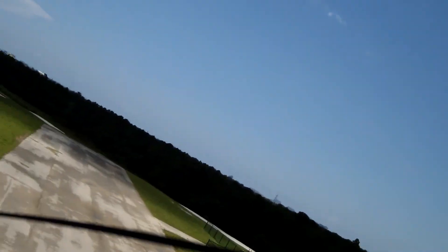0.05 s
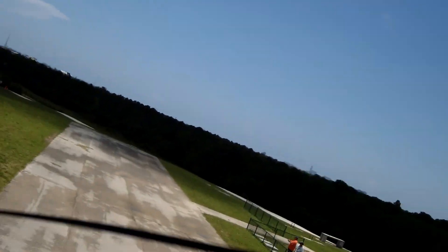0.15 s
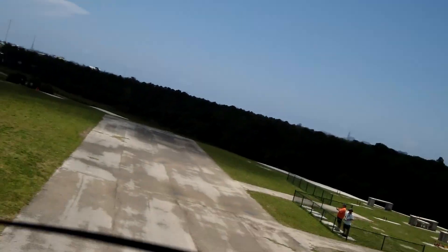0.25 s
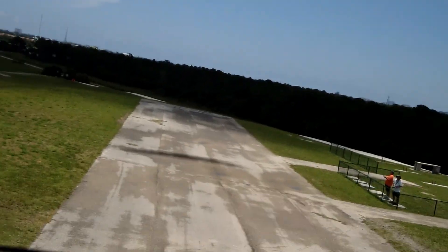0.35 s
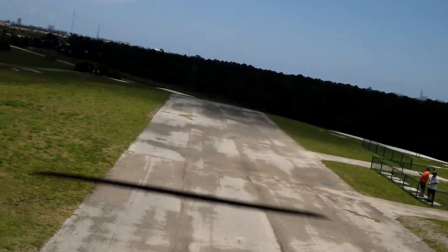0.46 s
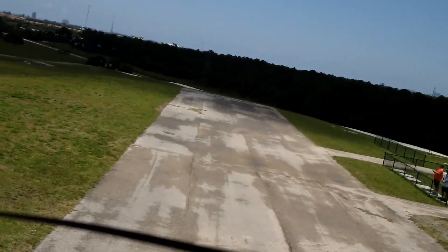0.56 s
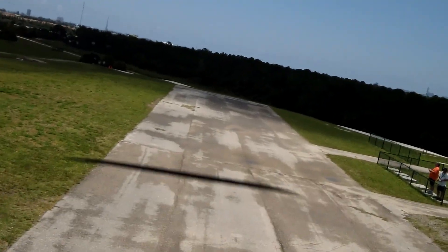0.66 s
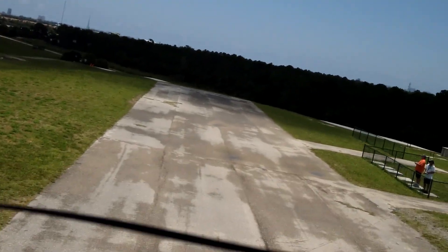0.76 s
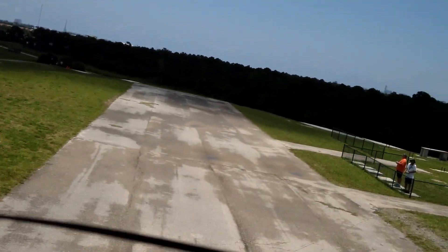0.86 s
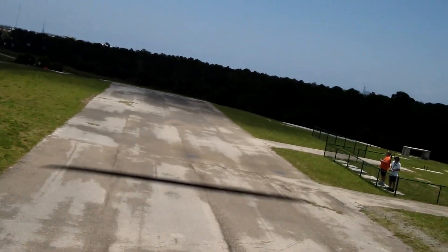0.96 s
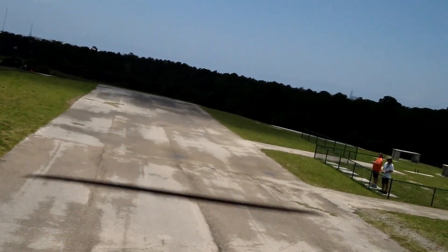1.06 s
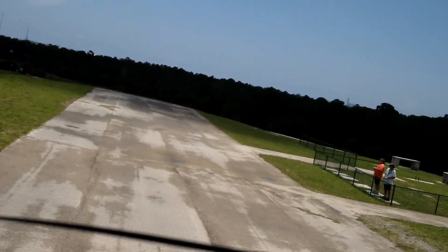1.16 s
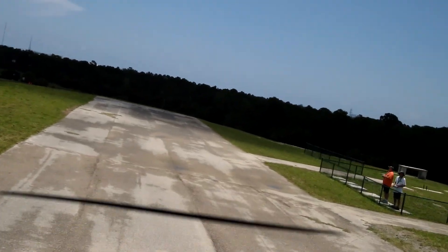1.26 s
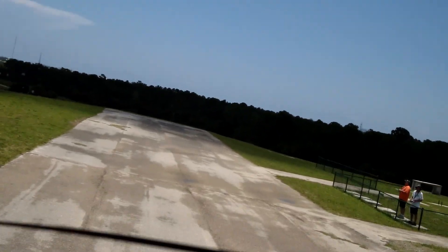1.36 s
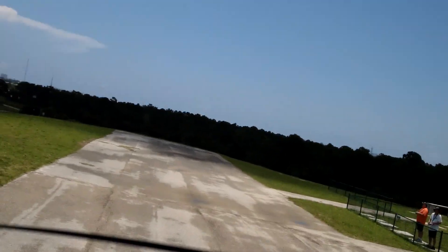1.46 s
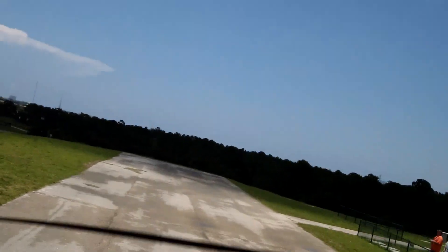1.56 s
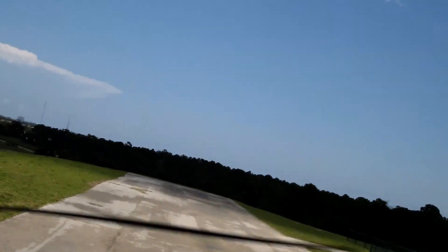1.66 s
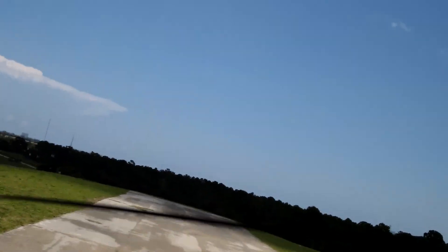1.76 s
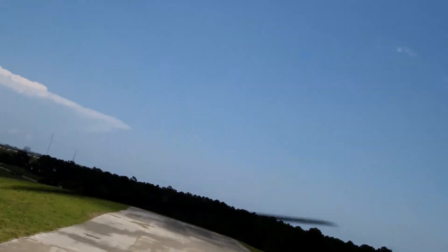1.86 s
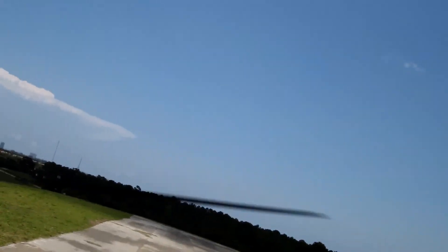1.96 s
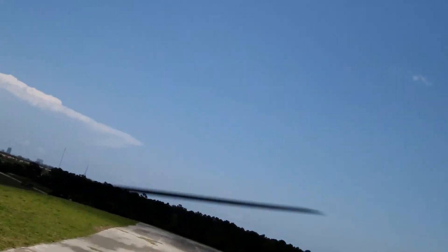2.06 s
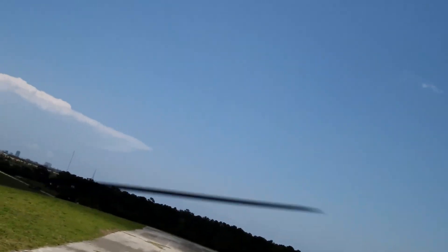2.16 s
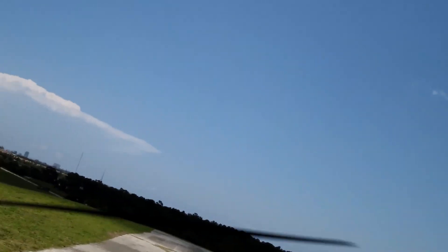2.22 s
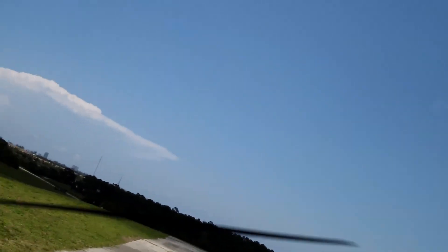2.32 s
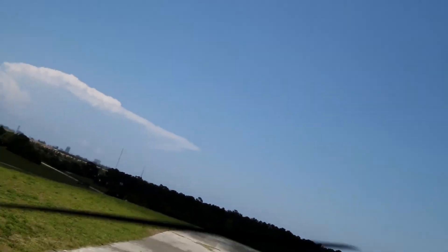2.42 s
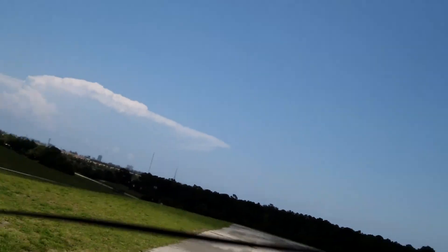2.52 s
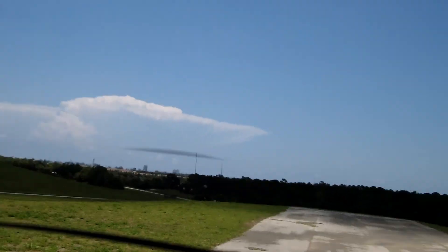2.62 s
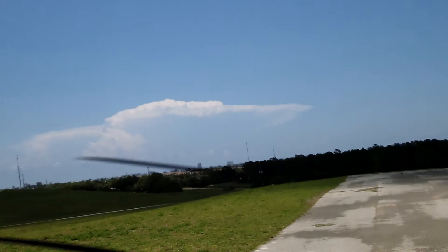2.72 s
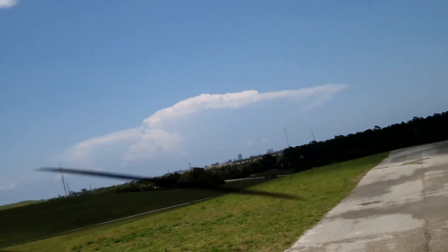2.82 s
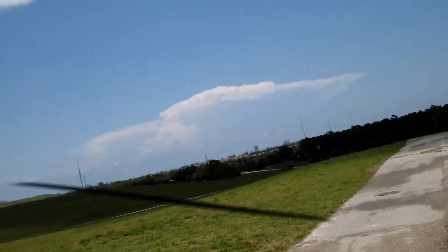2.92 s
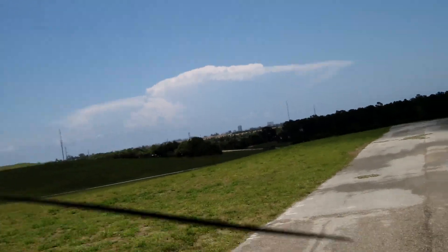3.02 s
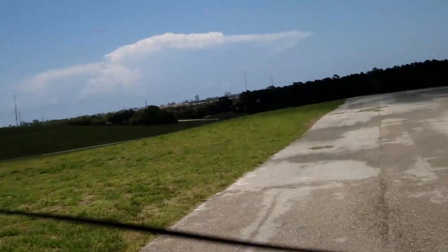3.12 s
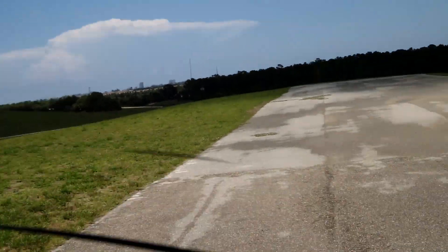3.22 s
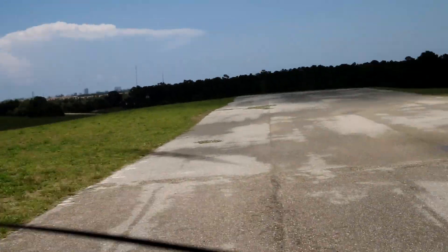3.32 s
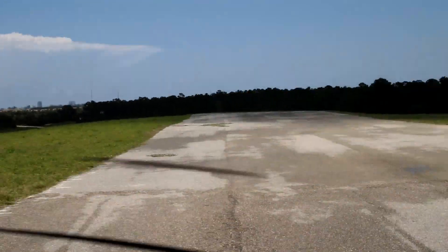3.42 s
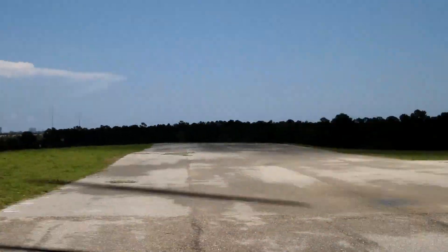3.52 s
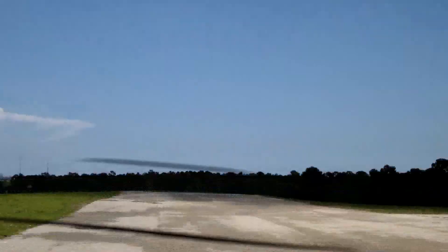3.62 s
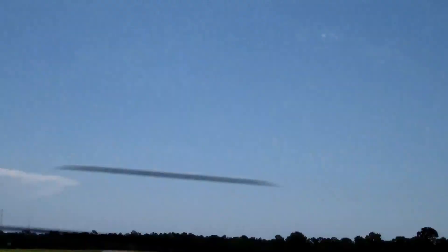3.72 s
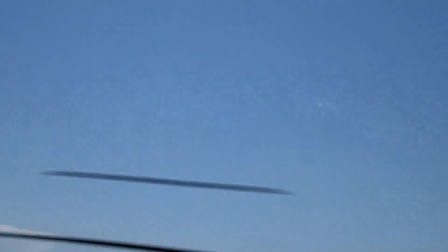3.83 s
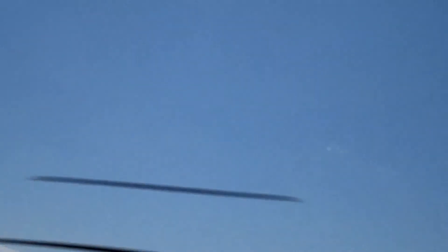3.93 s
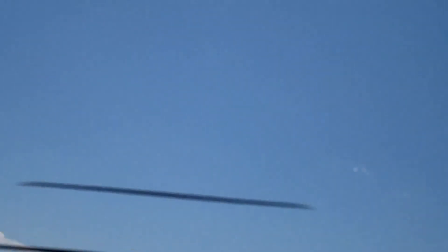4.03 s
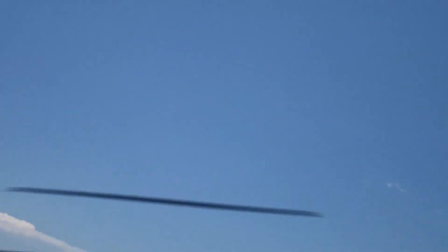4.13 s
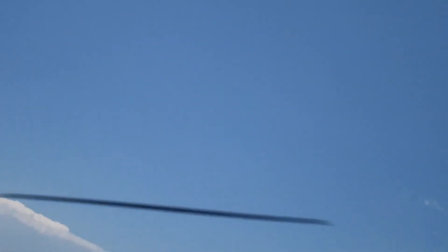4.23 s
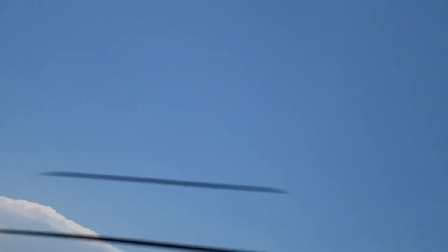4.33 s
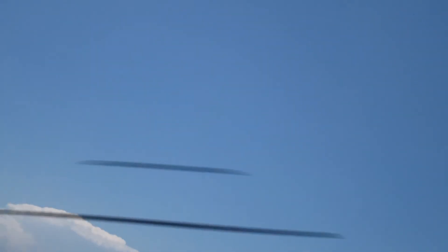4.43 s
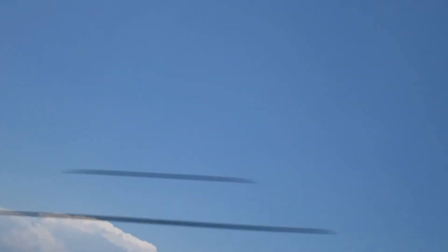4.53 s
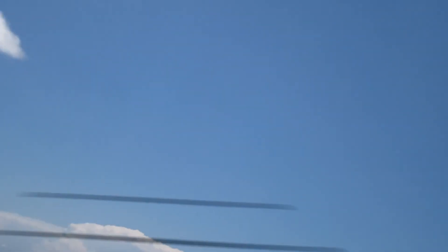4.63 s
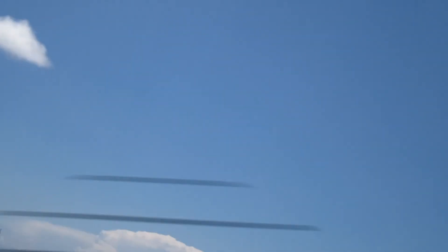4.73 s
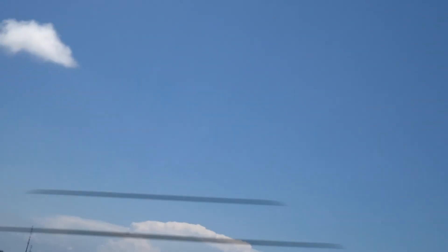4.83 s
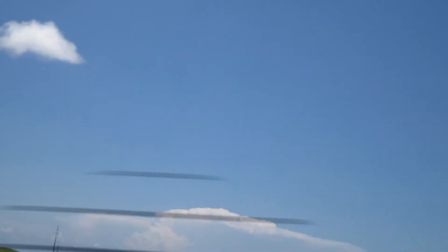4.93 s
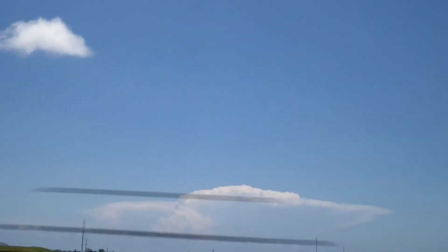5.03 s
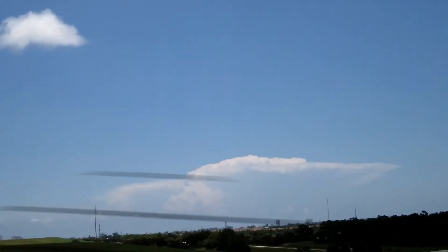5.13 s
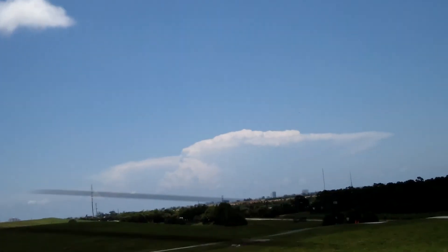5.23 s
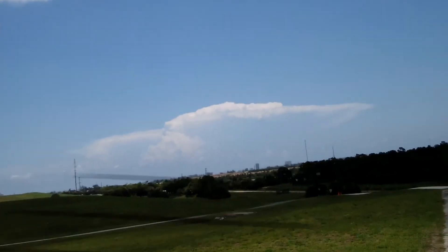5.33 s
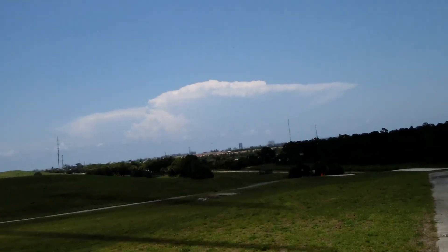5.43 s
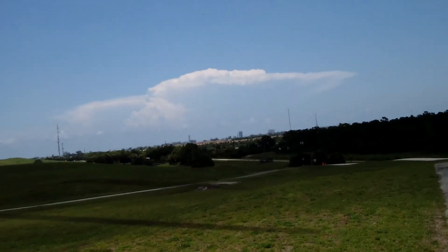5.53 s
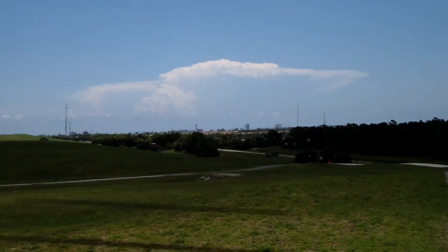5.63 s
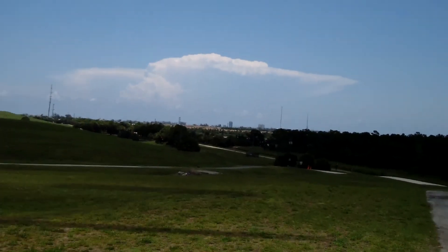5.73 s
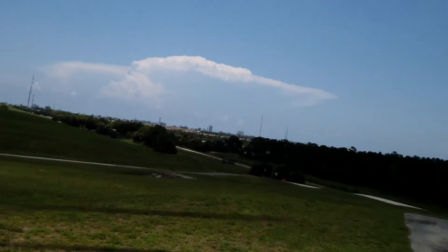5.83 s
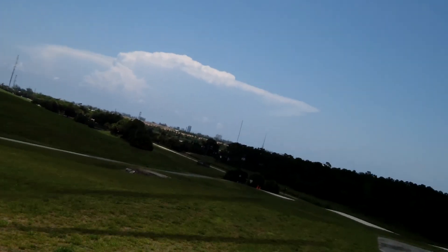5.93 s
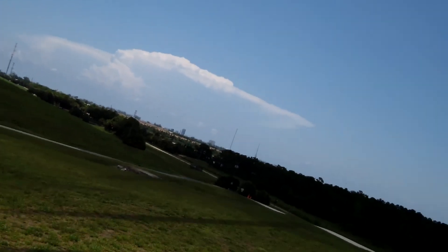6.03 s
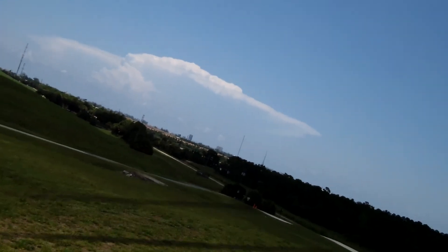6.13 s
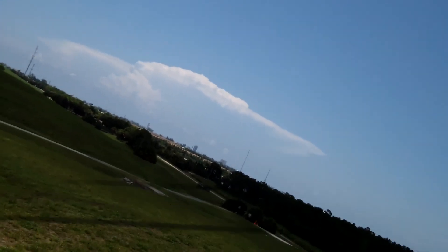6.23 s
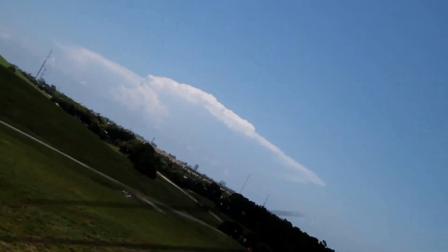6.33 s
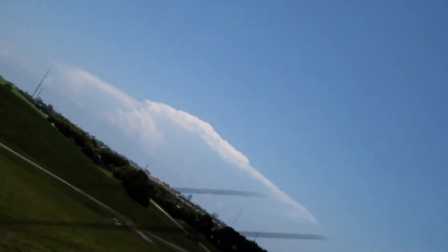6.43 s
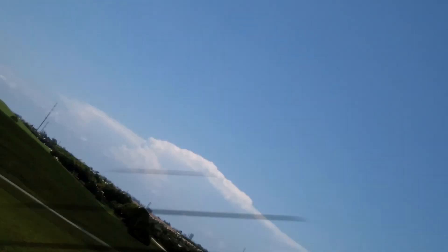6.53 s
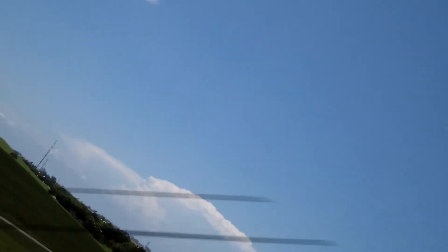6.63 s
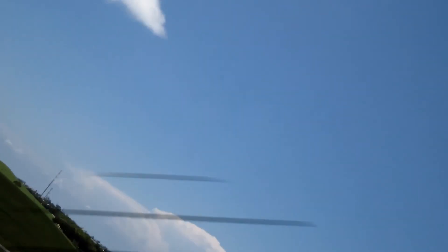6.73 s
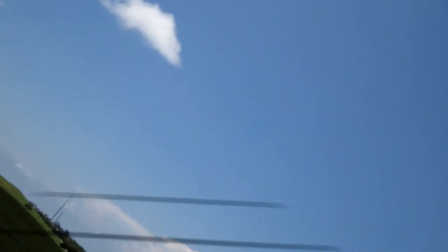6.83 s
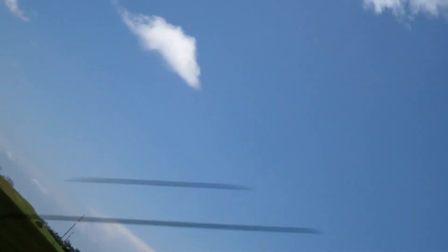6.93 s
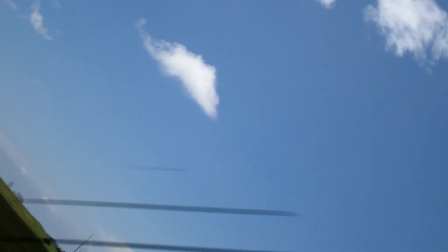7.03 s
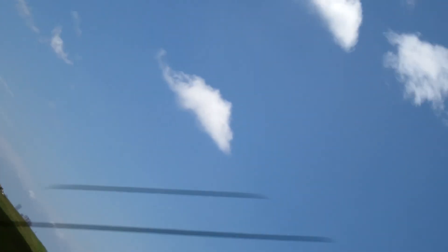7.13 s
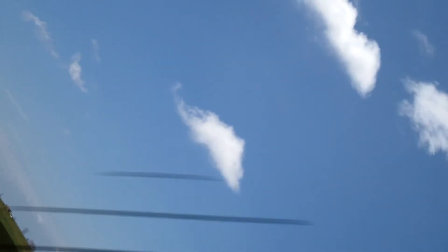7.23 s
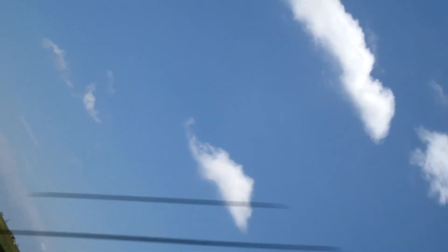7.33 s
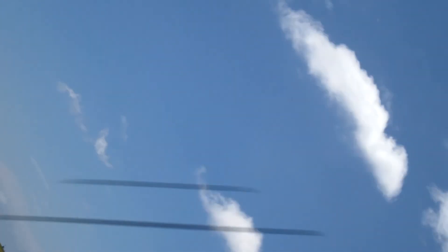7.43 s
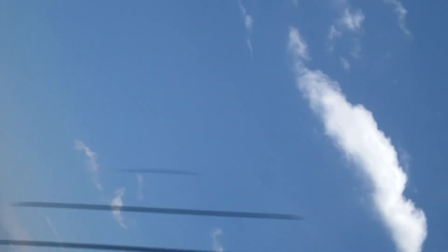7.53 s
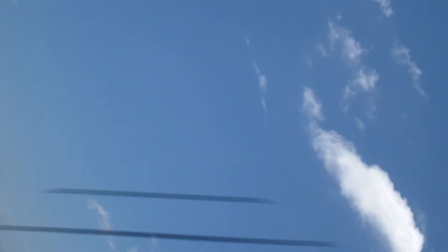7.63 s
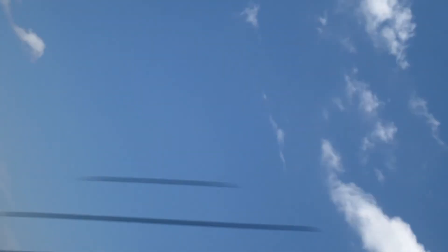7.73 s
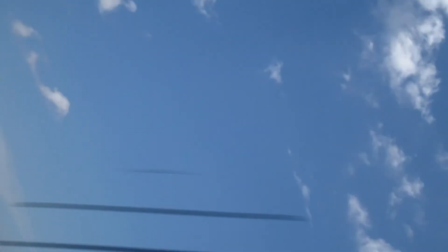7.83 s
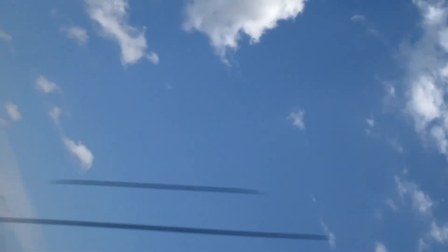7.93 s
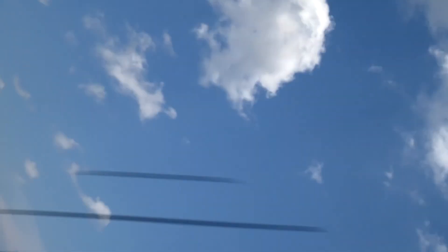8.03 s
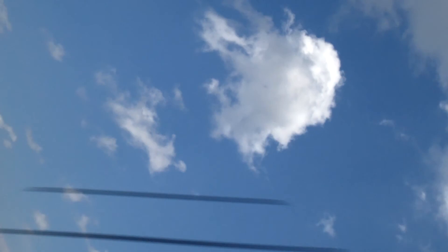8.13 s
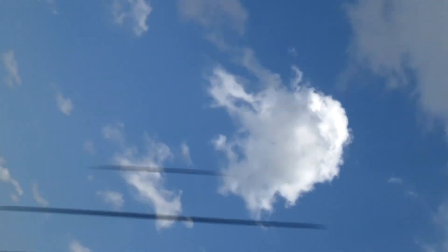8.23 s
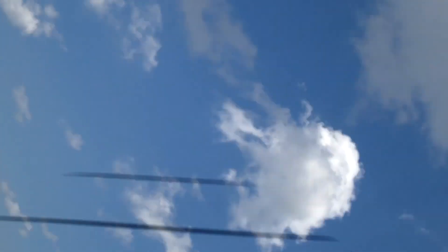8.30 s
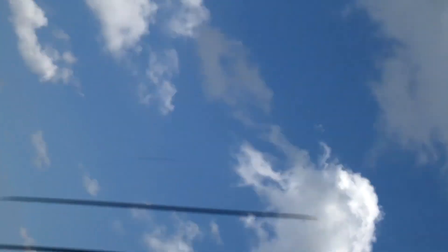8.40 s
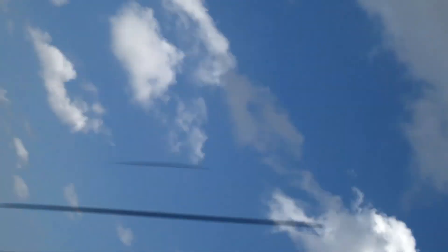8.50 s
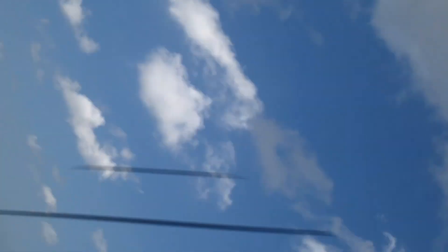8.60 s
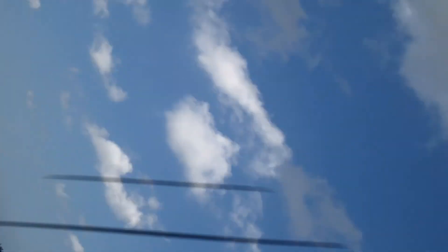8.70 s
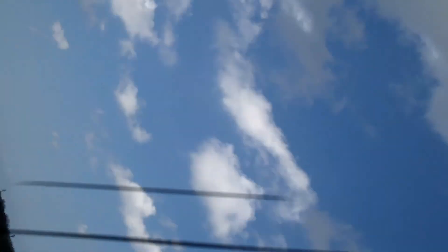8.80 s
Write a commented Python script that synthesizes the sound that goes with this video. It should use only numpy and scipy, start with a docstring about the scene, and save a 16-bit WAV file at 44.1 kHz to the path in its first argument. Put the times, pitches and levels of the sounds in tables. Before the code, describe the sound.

Close, dry onboard sound of a small electric model aeroplane. At first a low propeller buzz near 109 Hz sinks to about 95 Hz by 0.9 s, fluttering, with wind rumble, thin motor whine and tiny dry ticks. From 1 to 1.6 s it climbs to about 130 Hz and holds fairly steady until 3.5 s, slightly uneven, with a very faint treble hiss passing around 1.75 s and soft air slaps near 2.5 and 3 s. At 3.5-3.8 s it steps up to about 178 Hz, the blade thump weaker at first while gusts slap the microphone until 4.5 s. Between 4.4 and 4.8 s it surges to about 305 Hz, becoming a loud, dense, flattened and distorted drone with strong buffeting and rushing air. This holds to 8 s, then falls in steps to about 237 Hz, still loud and rough, stopping abruptly at 8.9 s.

```python
"""A two-blade propeller thumps the microphone of a camera strapped behind it on a small electric aeroplane.
Each blade pass is a push-pull pulse; the motor whines in shaft multiples through the foam airframe.
Propwash, as shaped noise, buffets the port, hisses in the airframe and rushes; gusts slap the port.
Shaft wobble, a switching tone, dry ticks and a brief treble shimmer lie beneath.
At full throttle the microphone stage overloads and the recorder flattens the peaks."""
import sys
import numpy as np
from scipy import signal
from scipy.fft import rfft, irfft, next_fast_len
from scipy.io import wavfile
from scipy.ndimage import uniform_filter1d

SR = 44100
rng = np.random.default_rng(int(sys.argv[2]) if len(sys.argv) > 2 else 0)


def store_pcm(level_fs):
    """Save levels as 16-bit WAV."""
    pcm = np.round(np.clip(level_fs, -1, 1) * 32767).astype(np.int16)
    wavfile.write(sys.argv[1], SR, np.atleast_2d(pcm).T)


N = 390726

# throttle, before rotor inertia and hunting: time_s, blade_pass_hz
THROTTLE = [(0, 109.3), (.15, 102.5), (.45, 97.8), (.9, 94.5), (1.1, 105.9), (1.23, 109.8), (1.37, 122),
            (1.58, 130), (1.88, 131.3), (2.3, 130.1), (2.82, 128.2), (3.44, 128.4), (3.56, 137.5),
            (3.7, 165), (3.79, 178.3), (4.43, 179), (4.6, 211), (4.82, 305.3), (5.6, 304.4), (7.96, 303.9),
            (8.2, 278), (8.32, 272.5), (8.5, 245), (8.64, 237.5), (8.86, 236.7)]
# blade pulses at the microphone: time_s, thump_db, sharpness (-1..1, sign = side that peaks), mismatch_db
BLADE_PULSES = [(0, -21, 0.39, -19), (.3, -12, 0.23, -18), (.85, -13.5, 0.3, -22), (1.15, -19, 0.43, -9),
                (1.5, -12.5, -0.16, -27), (2.2, -11, -.07, -21.5), (2.45, -15.5, 0.014, -27),
                (2.55, -11.5, -0.19, -19), (3.2, -9.5, -0.38, -12.5), (3.6, -12.5, -0.18, -16),
                (3.76, -13.5, -0.16, -33), (3.97, -21.5, -0.14, -37), (4.08, -16, -0.02, -39),
                (4.23, -16.5, -0.27, -37), (4.3, -10.5, -0.17, -40.5), (4.65, -7, -0.064, -20),
                (5.1, -3, 0.11, -33.5), (5.8, -1.5, 0.22, -32.5), (6.3, -3, 0.25, -32),
                (7.9, -3, 0.27, -33.5), (8.86, -3.5, .33, -20)]
# extra pulse lean as the throttle closes: time_s, lean_rad
PULSE_LEAN = [(0, 0), (7.9, 0.5), (8.35, -2.5), (8.86, -2.5)]
# levels that follow the speed: blade_pass_hz, buffet_db, airframe_hiss_db, rush_db, shaft_wobble_db
LEVELS_BY_SPEED = [(96.5, -22.5, -46, -55, -32), (111, -22.5, -43, -52, -28.5),
                   (131.7, -22, -45.5, -51, -30), (142, -24, -44, -53, -29),
                   (178.3, -19.5, -42.5, -40, -23.5), (232, -13, -41, -32, -17.5),
                   (304.6, -13.5, -40, -25, -15)]
# rough air, added to buffet and (scaled) to rush: time_s, level_db
ROUGH_AIR = [(0, 2.5), (.45, 1.5), (.9, -1.5), (1.2, 1.5), (2.45, -1), (2.55, 1), (3.6, -1.5), (3.75, -1.5),
             (4.03, 3), (4.3, -1.2), (4.8, -0.4), (6, 0.53), (8.86, -0.9)]
# relative buffet spectrum at the port: frequency_hz, density_db (per Hz)
BUFFET_SPECTRUM = [(20, -9), (60, 2), (120, 0), (250, -4), (420, -9.5), (600, -21.5), (900, -26),
                   (1500, -40.5), (3000, -55.5), (6000, -76), (16000, -91.5)]
# airframe resonances: centre_hz, width_hz, relative_db
AIRFRAME_MODES = [(800, 380, -1.5), (1296, 210, -2), (1707, 390, 10.5), (2300, 67, -9.5), (2860, 380, -4),
                  (3030, 180, -5.5), (3800, 1700, -12), (6100, 400, -24.5)]
# magnet and coil forces, before mount and speed gains: blade_rate_multiple, level_db
MOTOR_FORCES = [(6, -50), (6.5, -58), (7, -46), (9, -62), (12, -58), (14, -63), (16, -78), (18, -59),
                (21, -56), (24, -75), (28, -73)]
# transmission of the motor mount: frequency_hz, gain_db
MOUNT_GAIN = [(600, 0), (690, 9), (900, 0), (1250, -4), (1550, 5), (1700, 13), (1850, 12), (2000, 3),
              (2350, 1), (2750, 9), (2920, 15), (3080, 8), (3200, -14), (3600, -30)]
# whine gain: blade_pass_hz, gain_db
WHINE_GAIN_BY_SPEED = [(95, 1.5), (115, -1), (130, 1), (142, 2.5), (165, -5), (180, -3), (205, -2),
                       (240, -7), (305, -1.5)]
# clearest dry ticks, before the output filters: start_s, level_db
CLEAR_TICKS = [(.5447, -37), (.8914, -29), (1.0296, -37), (1.3039, -35), (1.4571, -30), (2.3027, -40),
               (2.5182, -33)]
# gusts that slap the port, before the band filter: start_s, level_db
PORT_SLAPS = [(2.52, -28), (3.009, -22), (3.033, -24), (3.746, -13), (3.808, -19), (3.935, -17),
              (4.066, -12), (4.243, -14), (4.302, -16), (4.48, -19)]

INERTIA_S, HUNT_SHARE, HUNT_RATE_HZ = .05, .003, 6
DOUBLET_RAD = 1.6  # phase step between pulse harmonics
FAST_HZ, EDDY_SHRINK = 297, 1.61  # blade rate of fully fast eddies; their pitch ratio
RUSH_PER_GUST = 1.2  # dB per dB
SWITCHING_HZ, SWITCHING_DB = 11530, -89
TICK_DECAY_S = .00003
FAINT_TICKS, FAINT_TICK_DB, FAINT_SPREAD_DB = 40, -46, 3
SHIMMER_HZ, SHIMMER_WIDTH_HZ, SHIMMER_DB = 6000, 250, -72.5
SHIMMER_MIDDLE_S, SHIMMER_HALF_S = 1.75, .42
VENT_HZ, MIC_HZ, COUPLING_HZ, RUMBLE_HZ = 25.7, 13100, 147, 30
OVERLOAD_TOP, OVERLOAD_BOTTOM, CEILING = 0.89, 0.75, .705  # clip levels, linear
HISS_DB, GAIN_DB = -76, -0.26
NOTCH_HZ, NOTCH_Q, TOP_HZ = 7700, 30, 15800


def undb(db):
    """Amplitude ratio of a level in dB."""
    return 10 ** (np.asarray(db) / 20)


def curves(rows):
    """Columns of a table, joined by straight lines in time."""
    time_s, *columns = np.transpose(rows)
    return [np.interp(np.arange(N) / SR, time_s, column) for column in columns]


def unit(x):
    """Scale to rms 1."""
    return x / np.sqrt(np.mean(x ** 2))


def coloured(gain_of_hz):
    """Noise of rms 1 with the given relative gain at each frequency."""
    size = next_fast_len(N)
    hz = np.arange(size // 2 + 1) * SR / size + 1e-3  # avoids 0 Hz
    spectrum = rfft(rng.standard_normal(size)) * gain_of_hz(hz)
    return unit(irfft(spectrum, size)[:N])


def walk(rate_hz):
    """Random levels held 1 / rate_hz and slewed twice; rms 1."""
    hold = int(SR / rate_hz)
    steps = np.repeat(rng.standard_normal(N // hold + 1), hold)
    slewed = uniform_filter1d(uniform_filter1d(steps, hold), hold)
    return unit(slewed[:N])


def bursts(rows, decay_s, sound):
    """Gate a sound at each event: sharp rise, exponential fall."""
    start_s, level_db = np.transpose(rows)
    gate = np.zeros(N)
    gate[(start_s * SR).astype(int)] = undb(level_db)
    envelope = signal.lfilter([1], [1, -np.exp(-1 / (decay_s * SR))], gate)
    return envelope * sound


def speed():
    """Blade rate in Hz: throttle smoothed by rotor inertia, with slight hunting that grows with speed."""
    throttle_hz, = curves(THROTTLE)
    smooth_hz = uniform_filter1d(throttle_hz, int(INERTIA_S * SR), mode="nearest")
    return smooth_hz * (1 + HUNT_SHARE * (throttle_hz / FAST_HZ) ** 2 * walk(HUNT_RATE_HZ))


def propeller(turn, sharp, mismatch_db, lean):
    """One push-pull pressure pulse a blade; turbulence shakes its size and timing."""
    shaken = turn + 0.12 * walk(60)
    # one blade bites harder and earlier than the other
    mismatch = undb(mismatch_db)
    bite = 1 + mismatch * np.cos(turn / 2)
    phase = shaken + mismatch * np.sin(turn / 2)
    pulse = sum(sharp ** k * np.cos((k + 1) * phase + k * (DOUBLET_RAD + lean)) for k in range(6))
    return np.sqrt(2) * pulse * bite * undb(0.64 * walk(70))


def buffet(turn, blade_hz, level_db):
    """Eddies buffet the port, pulsing with the blades."""
    hz, density_db = np.transpose(BUFFET_SPECTRUM)

    def eddies(shift):
        return coloured(lambda f: undb(np.interp(np.log(f / shift), np.log(hz), density_db)))

    slow, fast = eddies(1), eddies(EDDY_SHRINK)
    # a faster stream carries eddies past sooner, so the buffet climbs in pitch
    share = np.clip(blade_hz / FAST_HZ, 0, 1) ** 3
    mixed = np.sqrt(1 - share) * slow + np.sqrt(share) * fast
    return mixed * undb(level_db + 0.7 * walk(25)) * (1 + 0.25 * np.cos(turn))


def frame_gain(hz):
    """Relative gain of the airframe: power sum of resonances with steep skirts."""
    power = 0
    for centre_hz, width_hz, db in AIRFRAME_MODES:
        detuning = (hz - centre_hz) * (hz + centre_hz) / (hz * width_hz)
        power = power + (undb(db) / (1 + detuning ** 2)) ** 2
    return np.sqrt(power)


def airframe_hiss(turn, level_db):
    """Eddies rattle the resonant airframe, pulsing with the blades."""
    return coloured(frame_gain) * undb(level_db + 1.0 * walk(40)) * (1 + 0.17 * np.cos(turn))


def rush(level_db):
    """Broad noise of the wash rushing past the lens."""
    noise = coloured(lambda f: f / (f + 500) / (1 + (f / 1300) ** 2) ** 1.36)
    return noise * undb(level_db + 0.43 * walk(90))


def shaft(turn, wobble_db):
    """The unbalanced rotor shakes the mount once a turn."""
    level = undb(wobble_db + 1.2 * walk(30))
    return np.sqrt(2) * level * np.sin(turn / 2 + .3 * walk(30))


def motor(turn, blade_hz):
    """Clean multiples of the shaft rate, loud where the mount passes them."""
    mount_hz, mount_db = np.transpose(MOUNT_GAIN)
    whine = np.zeros(N)
    for multiple, force_db in MOTOR_FORCES:
        passed_db = np.interp(np.log(multiple * blade_hz), np.log(mount_hz), mount_db)
        level = undb(force_db + passed_db + 1.0 * walk(7))
        whine += np.sqrt(2) * np.sin(multiple * turn) * level
    return whine


def controller():
    """The speed controller's faint switching tone, wavering in level."""
    tone = np.sqrt(2) * np.sin(2 * np.pi * SWITCHING_HZ * np.arange(N) / SR)
    return undb(SWITCHING_DB + 2.5 * walk(8)) * tone


def ticks():
    """Dry exponential clicks, a few clear ones among faint scattered ones."""
    chance = rng.random((FAINT_TICKS, 2))
    start_s = chance[:, 0] * (N - 1) / SR
    level_db = FAINT_TICK_DB + FAINT_SPREAD_DB * (2 * chance[:, 1] - 1)
    return bursts(np.r_[CLEAR_TICKS, np.c_[start_s, level_db]], TICK_DECAY_S, 0.97)


def shimmer():
    """A faint, narrow hiss in the treble that swells and fades once."""
    offset = (np.arange(N) / SR - SHIMMER_MIDDLE_S) / SHIMMER_HALF_S
    noise = coloured(lambda f: 1 / (1 + ((f - SHIMMER_HZ) / SHIMMER_WIDTH_HZ) ** 2))
    return undb(SHIMMER_DB) * np.exp(-offset ** 4) * noise


def slaps():
    """Gusts slap the port: decaying bursts of band-limited noise."""
    noise = bursts(PORT_SLAPS, 0.011, rng.standard_normal(N))  # decay in s
    return signal.lfilter(*signal.butter(3, (250, 1400), "band", fs=SR), noise)


def scene():
    """Sum the sources, all driven by one rotor speed and phase."""
    blade_hz = speed()
    turn = 2 * np.pi * np.cumsum(blade_hz) / SR  # 2 pi per blade pass, 4 pi per shaft turn
    thump_db, sharp, mismatch_db = curves(BLADE_PULSES)
    lean, = curves(PULSE_LEAN)
    gust_db, = curves(ROUGH_AIR)
    law_hz, *laws = np.transpose(LEVELS_BY_SPEED)
    buffet_db, hiss_db, rush_db, wobble_db = (np.interp(np.log(blade_hz), np.log(law_hz), db) for db in laws)
    whine_db = np.interp(blade_hz, *np.transpose(WHINE_GAIN_BY_SPEED))
    mix = undb(thump_db) * propeller(turn, sharp, mismatch_db, lean)
    mix = mix + buffet(turn, blade_hz, buffet_db + gust_db)
    mix = mix + airframe_hiss(turn, hiss_db)
    mix = mix + rush(rush_db + RUSH_PER_GUST * gust_db)
    mix = mix + shaft(turn, wobble_db)
    mix = mix + undb(whine_db) * motor(turn, blade_hz)
    mix = mix + controller() + shimmer() + slaps()
    return mix[None]


def record(dry):
    """The microphone stage clips, a coupling capacitor lets flat tops sag, the converter clips again."""
    wave = signal.lfilter(*signal.butter(1, VENT_HZ, "high", fs=SR), dry)  # capsule vent bleeds deep bass
    wave = np.clip(wave, -OVERLOAD_BOTTOM, OVERLOAD_TOP)
    wave = signal.lfilter(*signal.butter(1, MIC_HZ, fs=SR), wave)
    wave = wave + ticks() + undb(HISS_DB) * rng.standard_normal(N)
    wave = signal.lfilter(*signal.iirnotch(NOTCH_HZ, NOTCH_Q, fs=SR), wave)  # narrow treble dip
    for cutoff_hz in (COUPLING_HZ, RUMBLE_HZ):
        wave = signal.lfilter(*signal.butter(1, cutoff_hz, "high", fs=SR), wave)
    wave = np.clip(undb(GAIN_DB) * wave, -CEILING, CEILING)
    return signal.sosfilt(signal.ellip(8, .2, 70, TOP_HZ, fs=SR, output="sos"), wave)


dry = scene()
out = record(dry)
store_pcm(out)
```